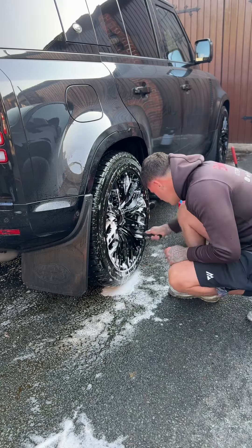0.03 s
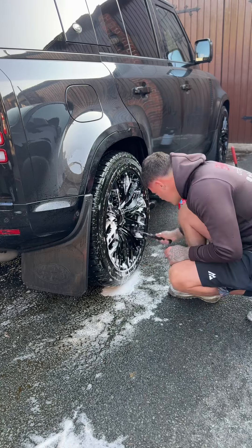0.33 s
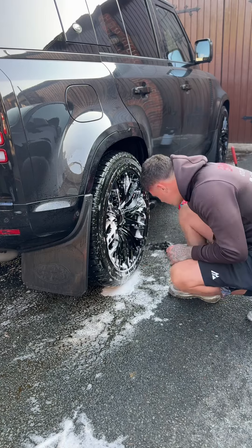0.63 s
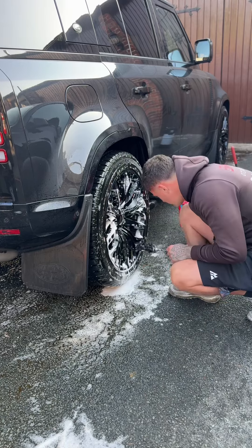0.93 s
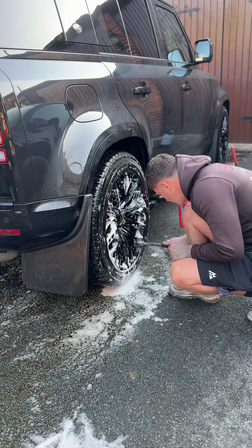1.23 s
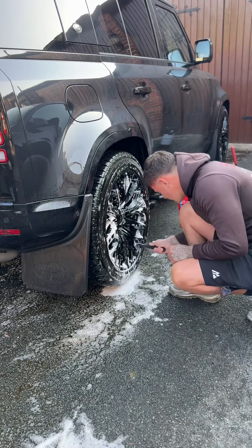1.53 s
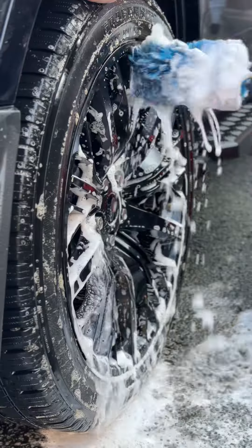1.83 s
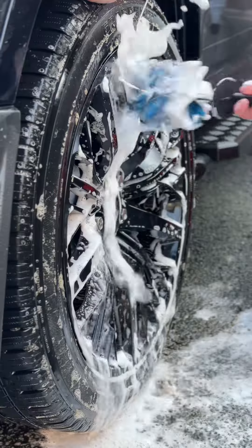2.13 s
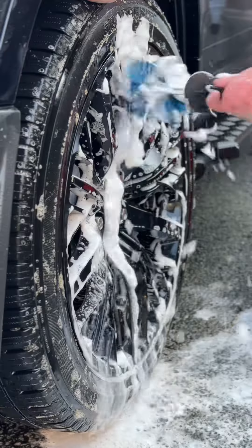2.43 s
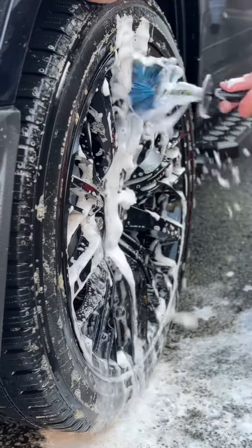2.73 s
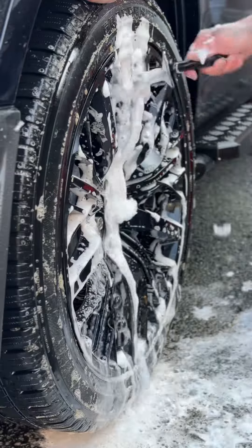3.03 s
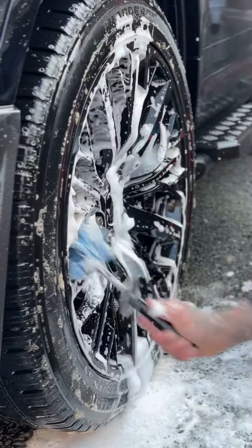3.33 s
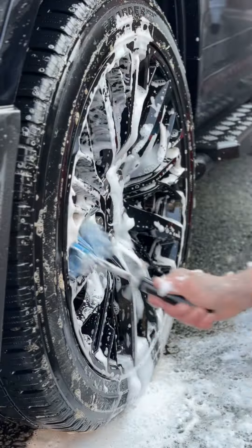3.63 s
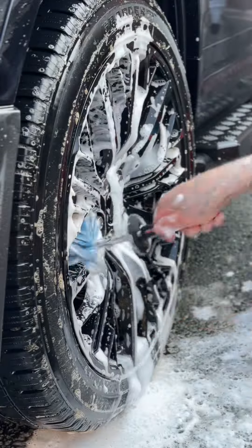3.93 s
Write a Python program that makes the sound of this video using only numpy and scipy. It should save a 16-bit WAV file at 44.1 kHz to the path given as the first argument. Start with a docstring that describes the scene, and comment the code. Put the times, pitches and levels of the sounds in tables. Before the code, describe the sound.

Rhythmic wet scrubbing on a foamy car wheel starts soft and distant, then turns suddenly close, with hissing bristles, slurping suds and plastic clicks. Underneath are a low outdoor rumble, far traffic and a few dull microphone bumps.

```python
"""A wet brush scrubs a soapy alloy wheel outdoors, first a few metres away, then close up.
Each stroke flicks the bristles, squeezes the foam and churns suds in the hollow behind the spokes.
Now and then a pocket of foam slurps, or the plastic brush stem clicks on the rim.
Underneath lie a low rumble, far traffic, faint whistles and a few dull bumps on the microphone;
a faint hum joins once the wheel is close."""
import sys
import numpy as np
from scipy import signal
from scipy.fft import rfft, irfft
from scipy.io import wavfile

SR = 44100
rng = np.random.default_rng(int(sys.argv[2]) if len(sys.argv) > 2 else 0)


def int16_out(signal):
    """Quantize to a 16-bit WAV file."""
    q = np.round(np.clip(np.atleast_2d(signal).T, -1, 1) * 32767)
    wavfile.write(sys.argv[1], SR, q.astype(np.int16))


N = 176400
T = np.arange(N) / SR
HZ = np.maximum(np.fft.rfftfreq(N, 1 / SR), 1)
OPPOSITE = np.array([[1], [-1]])   # plus in the left ear, minus in the right


def from_db(db):
    """Turn decibels (dB) into a factor to multiply by."""
    return 10 ** (np.asarray(db) / 20)


def rms_one(x):
    """Scale a sound so that its average level (rms) is 1."""
    return x / np.sqrt(np.mean(x ** 2) + 1e-20)


def in_time(rows):
    """Join rows of (seconds, values) with straight lines, one curve for each value."""
    s, *columns = np.transpose(rows)
    return [np.interp(T, s, c) for c in columns]


def over_hz(points):
    """Join rows of (Hz, value) into a curve, giving each octave equal room."""
    hz, value = np.transpose(points)
    return np.interp(np.log(HZ), np.log(hz), value)


def colour(x, spectrum):
    """Make some pitches stronger and others weaker; the result has level 1."""
    return rms_one(irfft(rfft(x) * from_db(over_hz(spectrum)), N))


def wavering_tone(hz, width_hz, shape=N):
    """Noise narrowed down to one pitch sounds like an unsteady tone."""
    return rms_one(irfft(rfft(rng.standard_normal(shape)) / (1 + ((HZ - hz) / width_hz) ** 2), N))


def ring(x, hz, t60):
    """Each click in x starts a tone that fades by 60 dB in t60 seconds."""
    r, w = from_db(-60 / (t60 * SR)), 2 * np.pi * min(hz, 17000) / SR
    return signal.lfilter([0, np.sin(w)], [1, -2 * r * np.cos(w), r * r], x + 1e-18)


def pip(x, hz, t60):
    """Ringing twice over gives a purer tone that swells briefly."""
    return ring(ring(x, hz, t60), hz, t60)


def add(out, s, x):
    """Mix in a short sound, starting at s seconds."""
    i = max(int(s * SR), 0)
    out[i:i + len(x)] += x[:N - i]


def grains(per_s, spread_db):
    """Random clicks of uneven size."""
    sizes = from_db(spread_db * np.minimum(rng.exponential(1, N), 5)) * rng.choice([-1, 1], N)
    return sizes * (rng.random(N) < per_s / SR)


def closeness():
    """0 while the wheel is far, 1 once it is close."""
    start_s, fade_s = 1.828, 0.013
    return np.clip((T - start_s) / fade_s, 0, 1)


def echo(x, cut_hz=4000, t60=0.15):
    """Sound bounces off car body, ground and fence: a brief dull echo, different at each ear."""
    t = T[:SR // 3]
    tail = signal.sosfilt(signal.butter(2, cut_hz, fs=SR, output="sos"), rng.standard_normal((2, len(t))))
    decay = from_db(-60 * t / t60) * (t > .002)
    return signal.fftconvolve(x[None], tail * decay / np.sqrt(np.sum(decay ** 2)), axes=1)[:, :N]


def rumble(width_db=-28.5):
    """Deep noise rises and falls, almost the same in both ears."""
    # The rumble's loudness. Each row: time in seconds, level in dB.
    levels = [(0, -38), (.25, -39.5), (.6, -40.5), (1.2, -40.5), (1.75, -42), (1.95, -37.5), (2.5, -36),
              (3.0, -37), (3.3, -30.5), (3.65, -39.5), (4, -36.5)]
    # Its tone colour. Each row: pitch in Hz, relative strength in dB.
    spectrum = [(20, -43), (32, -9), (45, -6), (59, 2.5), (74, -6.5), (100, -13.5), (150, -20),
                (230, -26.5), (330, -33), (600, -99)]
    middle, side = rng.standard_normal((2, N))
    return colour(middle + from_db(width_db) * side * OPPOSITE, spectrum) * from_db(in_time(levels)[0])


def traffic(far_db=-50.5, shelter_db=-1.5):
    """A wide wash of far traffic, a little quieter in the shelter of the wheel."""
    # The traffic's tone colour. Each row: pitch in Hz, relative strength in dB.
    spectrum = [(70, -4), (140, 2), (250, 2), (450, -1.5), (750, 1.5), (1100, -5), (1600, -12.5),
                (2500, -19.5), (4000, -29.5), (7500, -29), (10000, -39), (16000, -71)]
    # How wide it sounds. Each row: pitch in Hz, side level compared with the middle in dB.
    widths = [(100, -26), (250, -13), (450, -7.5), (800, -0.5), (1500, -10), (3000, -47), (6000, 6.5),
              (10000, 4.5), (16000, 45)]
    width = from_db(over_hz(widths))
    middle, side = rfft(rng.standard_normal((2, N)))
    wash = irfft((middle + width * side * OPPOSITE) / np.hypot(1, width), N)
    return from_db(far_db + shelter_db * closeness()) * colour(wash, spectrum)


def whistles():
    """Thin, wavering high tones come and go in the distance."""
    # Each row: middle in seconds, length in seconds, pitch in Hz, level in dB.
    tones = [(0.084, 0.083, 5460, -75), (.3, 0.14, 7800, -75.5), (0.607, 0.13, 6040, -73),
             (.68, 0.11, 7050, -76), (1.625, 0.25, 8070, -73)]
    out = 0
    for middle, length, hz, db in tones:
        envelope = 1 / (1 + (2 * (T - middle) / length) ** 12)
        out = out + from_db(db) * envelope * wavering_tone(hz, width_hz=220, shape=(2, N))
    return out


def hum():
    """Faint unsteady tones, as of a running motor, heard once the wheel is close."""
    # Each row: pitch in Hz, level in dB.
    overtones = [(173, -61), (231, -60)]
    return closeness() * sum(from_db(db) * wavering_tone(hz, width_hz=2.1) for hz, db in overtones)


def bumps(rise_s=0.0113):
    """Bumps on the microphone make low thuds that swell quickly and die away."""
    # Each row: start in seconds, peak level in dB, pitch in Hz, seconds to fade by 60 dB.
    thuds = [(0.094, -32.5, 101, 0.17), (0.165, -34, 109, 0.11), (0.216, -23, 70, 0.079),
             (3.172, -27, 155, 0.018), (3.207, -15.5, 78.6, 0.15), (3.218, -34, 196, 0.12),
             (3.269, -23.5, 69, 0.16)]
    out, t = np.zeros(N), T[:SR // 2]
    for s, db, hz, t60 in thuds:
        envelope = np.minimum(t / rise_s, 1) * from_db(db - 60 * np.maximum(t - rise_s, 0) / t60)
        add(out, s, envelope * np.sin(2 * np.pi * hz * t))
    return out


def stem_clicks():
    """The plastic stem hits the rim, chatters briefly and rings; a bright crack lies on top."""
    # Each row: start in seconds, level in dB (as if packed into click_s), ring pitch in Hz,
    # crack compared with the ring in dB, echo compared with the click in dB.
    hits = [(0.798, -54.5, 4230, 7, 2), (.848, -60, 4420, 6, 6), (1.021, -56.5, 5600, 17, 4),
            (1.175, -58.5, 2500, 2, 7), (1.548, -51.5, 2120, -8, -4), (1.705, -39, 1820, 1.5, 1.5),
            (1.78, -50, 1559, -12, 3), (1.832, -56, 6000, 13, -9), (1.8416, -42.5, 2110, 1, -29),
            (1.8658, -34.5, 2120, 7, -35), (1.871, -39, 3580, 5, -11), (1.8949, -34.5, 2800, -1, -26),
            (1.9204, -26.5, 2300, -7, -50), (1.985, -39.5, 3860, 3, -36), (2.012, -44.5, 3800, -6, -15),
            (2.032, -31, 3310, 5, -41), (2.111, -37, 6800, 11, -42), (2.462, -41.5, 1710, -7, -32),
            (2.509, -32, 2940, 3, -32), (2.5378, -37, 1500, -11, -35), (2.563, -33.5, 1660, -16, -43),
            (2.628, -44, 2960, 6, -12), (2.6588, -40, 1620, 0, -23), (2.6947, -42, 1890, 9, -37),
            (2.711, -35.5, 1560, -0.5, -41.5), (3.0286, -37.5, 1920, 0, -42), (3.1812, -41.5, 2260, 4, -13),
            (3.2037, -50, 2000, -2, -24), (3.261, -48.5, 1560, -8, -23), (3.7833, -37.5, 2710, -6, -47)]
    # The click's tones: the stem's own, plus at 0.22 a dull thud of the wheel. Each row: multiple of the ring
    # pitch, relative level in dB, fade in seconds.
    modes = [(.22, -14.5, .006), (.5, -13, .005), (1, 4.5, 0.004), (1.2, -4, 0.0043), (2, -15, 0.0026)]
    click_s, chatter_db, chatter_t60 = .005, -21.5, 0.033
    crack_rise_s, crack_t60, crack_band_hz = 0.00073, 0.027, [2230, 10500]
    direct, to_echo, t = np.zeros(N), np.zeros(N), T[:SR // 16]
    bright = signal.butter(1, crack_band_hz, "band", fs=SR, output="sos")
    crack_envelope = np.minimum(t / crack_rise_s, 1) * from_db(-60 * t / crack_t60)
    for s, db, hz, crack_db, echo_db in hits:
        chatter, grit = rng.standard_normal((2, len(t)))
        force = (t == 0) + from_db(chatter_db - 60 * t / chatter_t60) * chatter
        body = sum(from_db(level) * rms_one(pip(force, hz * ratio, t60)) for ratio, level, t60 in modes)
        crack = from_db(crack_db) * rms_one(signal.sosfilt(bright, crack_envelope * grit))
        click = from_db(db) * rms_one(rms_one(body) + crack) * np.sqrt(click_s / t[-1])
        add(direct, s, click)
        add(to_echo, s, from_db(echo_db) * click)
    return direct + echo(to_echo)


def slurps():
    """Collapsing foam keeps an air pocket ringing; its pitch slides as it changes size."""
    # Each row: middle in seconds, length in seconds, pitch in Hz, level in dB, slide in octaves a second.
    pockets = [(1.97, .055, 470, -43.5, -1), (2.125, 0.039, 1126, -41, -0.4), (2.122, .04, 3080, -45, -0.8),
               (2.28, 0.062, 1530, -45.5, 0.4), (2.43, 0.065, 1054, -44, 0), (2.555, 0.054, 1854, -44.5, 1),
               (2.553, 0.027, 2300, -42.5, 2), (2.57, 0.058, 662, -43.5, 0.5), (2.705, .04, 587, -43, .5),
               (2.722, 0.034, 1527, -42.5, 0.3), (2.86, 0.027, 693, -41.5, .5),
               (2.885, 0.043, 847, -43.5, -0.3), (3.76, 0.047, 1504, -49, -4.5),
               (3.9, 0.025, 4150, -45.5, -0.3)]
    out, t = np.zeros(N), T[:SR // 4] - T[SR // 8]
    for middle, length, hz, db, glide in pockets:
        pocket = pip(rng.standard_normal(SR // 2), hz, t60=0.017)
        sliding = np.interp(np.cumsum(2 ** (glide * t)), np.arange(len(pocket)), pocket)
        envelope = .5 ** np.minimum((2 * t / length) ** 2, 60)
        slurp = rms_one(sliding * envelope) * np.sqrt(np.mean(envelope ** 2))
        add(out, middle + t[0], from_db(db) * slurp)
    return out


def bubbles(per_s, cycles, low_hz, high_hz, spread_db=2.5, count=28):
    """Bubbles of random pitch each ring for the given number of cycles."""
    pops, pitch_index = grains(per_s, spread_db), rng.integers(0, count, N)
    pitches = np.geomspace(low_hz, high_hz, count)
    return sum(hz * ring(pops * (pitch_index == k), hz, cycles / hz) for k, hz in enumerate(pitches))


def hollow(x):
    """The hollow behind the spokes boosts the pitches it rings at; the result has level 1."""
    # Each row: pitch in Hz, boost in dB, width in Hz.
    resonances = [(447, 12.5, 26), (672, 7.5, 64), (1014, 0.5, 33), (1508, 6, 36), (1890, 3.5, 26),
                  (2290, 2, 110), (2700, 5, 30), (3110, 2.5, 110)]
    boost_db = sum(db / (1 + (2 * (HZ - hz) / width_hz) ** 2) for hz, db, width_hz in resonances)
    return rms_one(irfft(rfft(x) * from_db(boost_db), N))


def churning_suds():
    """Big bubbles gulp in the hollow."""
    # Their tone colour. Each row: pitch in Hz, relative strength in dB.
    spectrum = [(200, -5), (340, -6), (460, -5.5), (560, 0.5), (690, -2.5), (1000, 3.5), (1400, -7),
                (2500, -35)]
    return hollow(colour(bubbles(per_s=1200, cycles=20.7, low_hz=312.6, high_hz=1670), spectrum))


def squeezed_foam():
    """Thousands of small bubbles blend into a squelch."""
    # Its tone colour. Each row: pitch in Hz, relative strength in dB.
    spectrum = [(500, -12.5), (900, -10.5), (1150, -1), (1500, 0.5), (1900, 0.5), (2300, -2.5),
                (3000, -6.5), (4200, -9), (8000, -20)]
    return hollow(colour(bubbles(per_s=5500, cycles=17, low_hz=692, high_hz=5700), spectrum))


def bristle_flicks(snap_db=-7.5, snap_t60=0.0063):
    """Bristle tips make a fine hiss; stiff bristles spring off a spoke with coarser snaps."""
    # Their tone colour. Each row: pitch in Hz, relative strength in dB.
    spectrum = [(1500, -12), (2500, -3), (3400, -2), (5000, -3), (7200, -2.5), (10000, -1), (13000, -8),
                (16000, -6)]
    fade = from_db(-60 * T[:SR // 50] / snap_t60)
    snaps = signal.fftconvolve(grains(per_s=220, spread_db=3.5), fade)[:N] * rng.standard_normal(N)
    hiss = grains(per_s=9000, spread_db=3)
    return colour(rms_one(hiss) + from_db(snap_db) * rms_one(snaps), spectrum)


def swell(layer, lag_s, stretch):
    """Each stroke swells and fades with the brush's speed. Layer 0 is bristles, 1 foam, 2 suds."""
    # Each row: middle in seconds, length before stretching in seconds, bristle, foam and suds levels in dB.
    strokes = [(-0.012, 0.036, -55, -56, -54), (0.182, 0.076, -60, -63, -61),
               (0.466, 0.092, -60, -60.5, -67), (0.838, 0.1, -65.5, -64, -68),
               (0.926, 0.014, -57, -67.0, -61), (1.068, 0.059, -64, -65.5, -65),
               (1.259, 0.065, -56.5, -57, -82), (1.431, 0.031, -58.5, -54, -76),
               (1.508, 0.097, -63.5, -62.5, -61), (1.88, 0.024, -47, -49, -50),
               (1.952, 0.065, -46.5, -42, -40), (2.123, 0.049, -47.5, -40.5, -39.5),
               (2.274, 0.049, -45.5, -41, -39.5), (2.369, 0.019, -80, -48, -45.5),
               (2.434, 0.04, -44.5, -40.5, -43.5), (2.564, 0.051, -44.5, -43.5, -40),
               (2.72, 0.038, -42, -38.5, -41.5), (2.867, 0.075, -46, -43.5, -42.5),
               (2.99, 0.028, -46.5, -46, -46.5), (3.095, 0.041, -53, -56, -54.5),
               (3.198, 0.027, -49, -45, -46.5), (3.332, 0.041, -44.5, -43, -54.5),
               (3.459, 0.043, -44, -43, -53.7), (3.624, 0.037, -45, -44, -54),
               (3.748, 0.068, -50, -51, -78), (3.905, 0.033, -40.5, -42.5, -54),
               (4.023, 0.045, -49, -54, -51)]
    rise_share, roundness = 0.57, 1.65   # part of a stroke spent swelling; 1 is pointed, 2 rounded
    power = 1e-14
    for middle, length, *levels in strokes:
        t = (T - middle - lag_s) / (length * stretch)
        from_peak = np.abs(t) / np.where(t < 0, rise_share, 1 - rise_share)
        power = power + from_db(levels[layer]) ** 2 * .5 ** np.minimum(from_peak ** roundness, 60)
    return np.sqrt(power)


def scrubbing():
    """Bristles lead each stroke, foam squelches at its height, and the suds churn just after."""
    # Light contact between close strokes. Each row: time in seconds, bristle and foam levels in dB.
    contact = [(1.85, -49, -60), (2.1, -51, -61), (2.35, -57.5, -60), (3.1, -63, -63), (4.0, -58, -57.5)]
    close = closeness()
    bristle_rest, foam_rest = from_db(in_time(contact)) * close
    bristles = bristle_flicks() * np.hypot(swell(0, lag_s=-0.0032, stretch=1.134), bristle_rest)
    foam = squeezed_foam() * np.hypot(swell(1, lag_s=0, stretch=0.93), foam_rest)
    suds = churning_suds() * swell(2, lag_s=0.004, stretch=0.88)
    direct = bristles + foam + suds + slurps()
    close_echo = from_db(-30) * echo((foam + suds) * close, cut_hz=550)
    far_echo = from_db(-0.5) * echo(direct * (1 - close))
    return direct + close_echo + far_echo


def scene():
    """Mix everything; the brush's treble reaches the two microphone openings out of step."""
    # Each row: pitch in Hz, phase difference between left and right in radians.
    phase_gaps = [(5100, 0), (6000, -.5), (7000, -1.2), (8000, -1.7), (9500, -2.3), (10700, -3.05),
                  (13200, -3.2), (14500, -3.8), (16000, -4.3)]
    shift = np.exp(.5j * over_hz(phase_gaps) * OPPOSITE)
    brush = irfft(rfft(scrubbing() + stem_clicks()) * shift, N)
    return brush + rumble() + traffic() + hum() + bumps() + whistles()


def record(dry):
    """Cut away the very highest treble steeply."""
    cutoff_hz = 16100
    return irfft(rfft(dry) / np.sqrt(1 + (HZ / cutoff_hz) ** 160), N)


dry = scene()
out = record(dry)
int16_out(out)
```